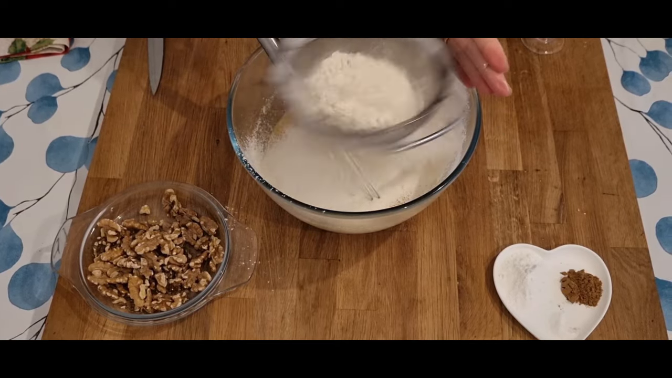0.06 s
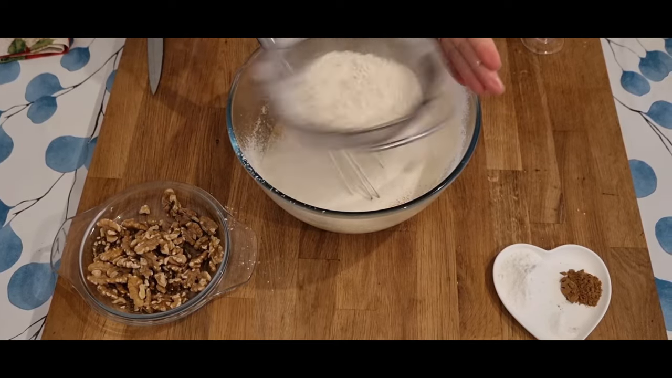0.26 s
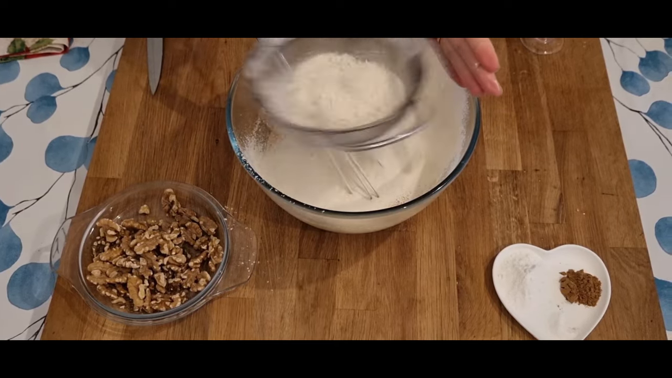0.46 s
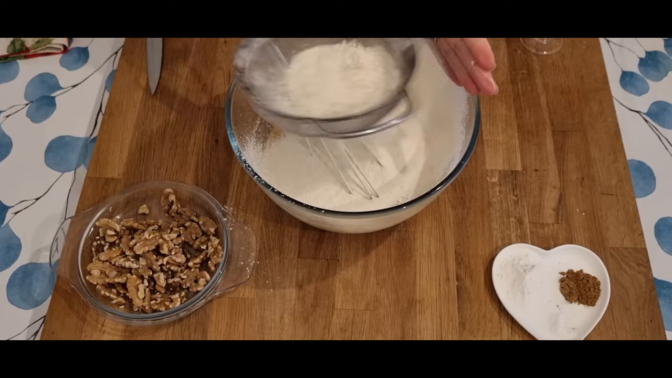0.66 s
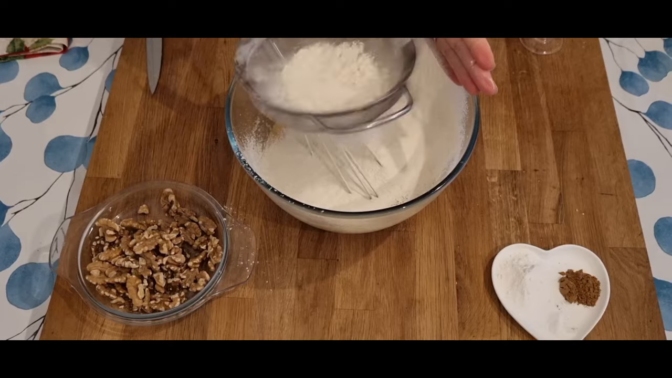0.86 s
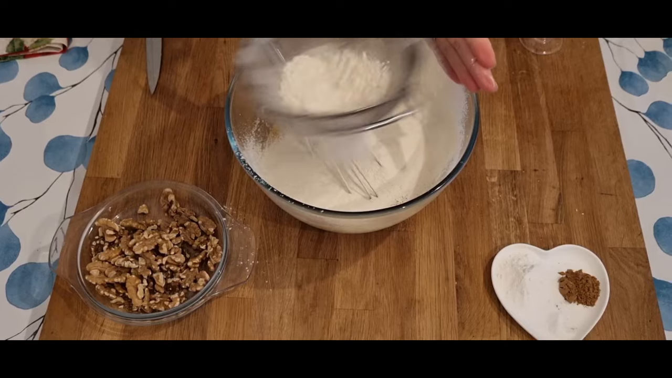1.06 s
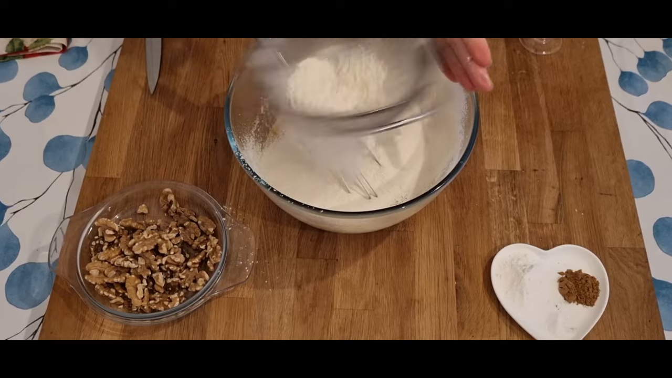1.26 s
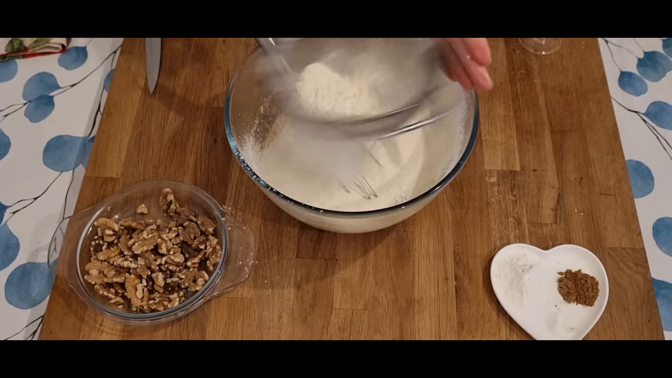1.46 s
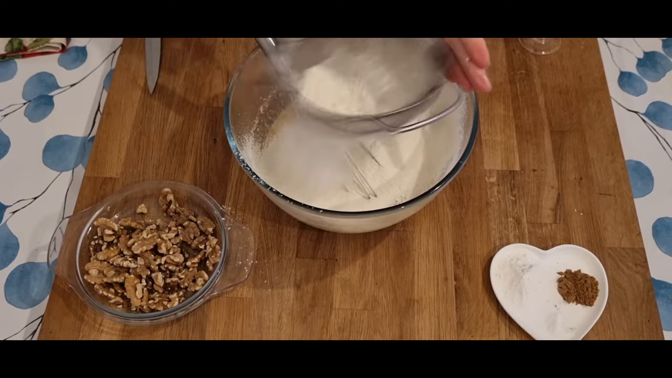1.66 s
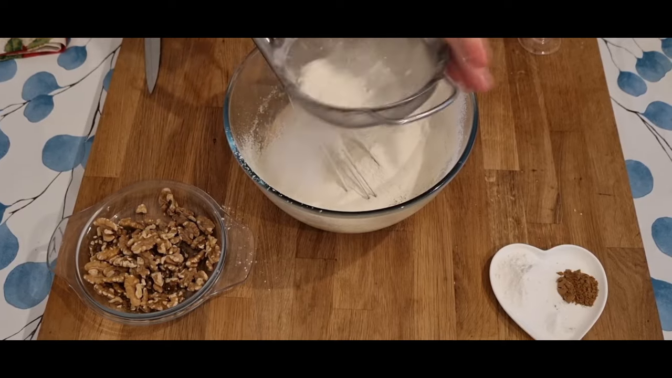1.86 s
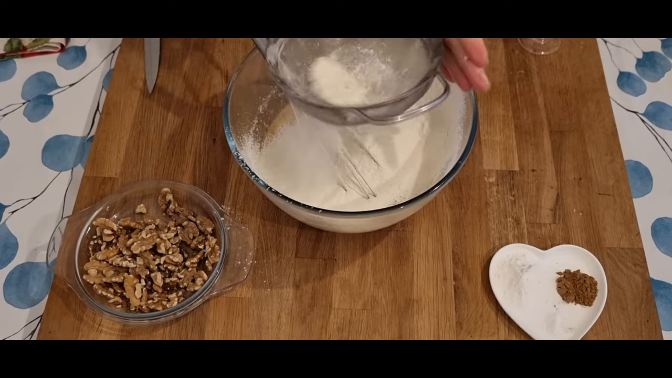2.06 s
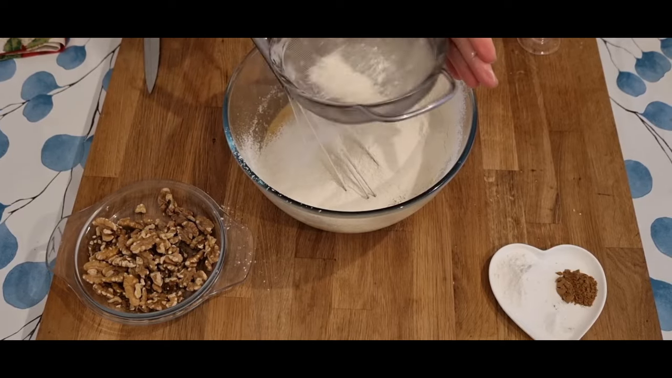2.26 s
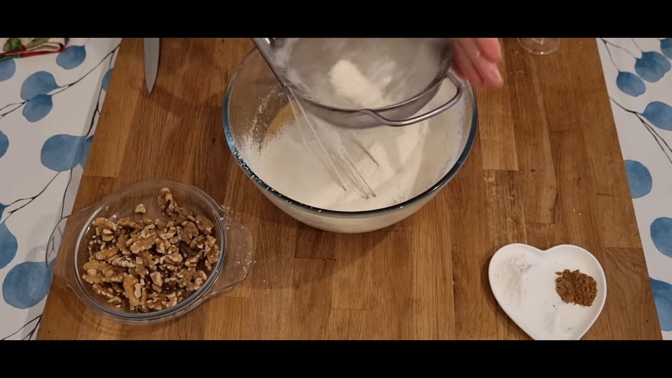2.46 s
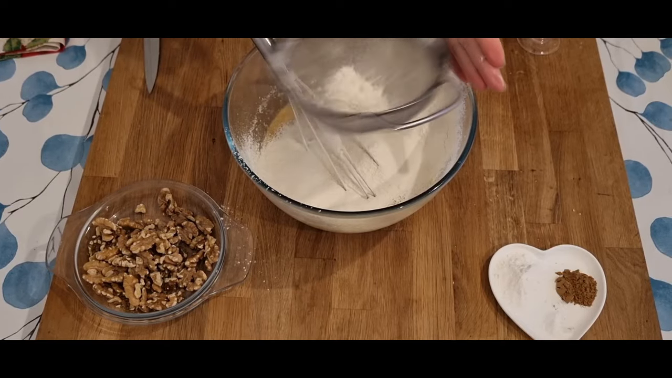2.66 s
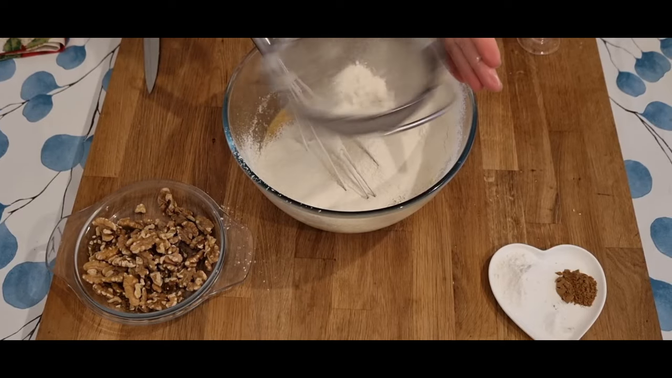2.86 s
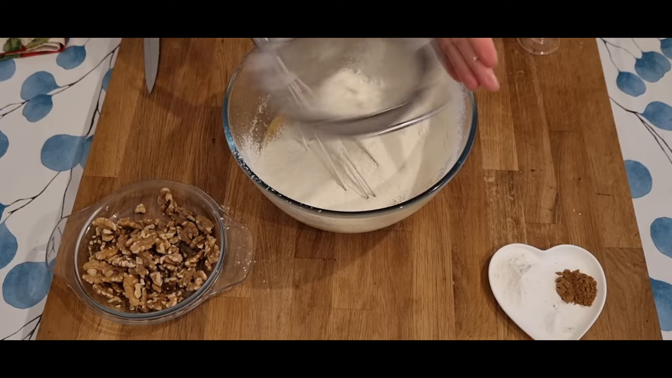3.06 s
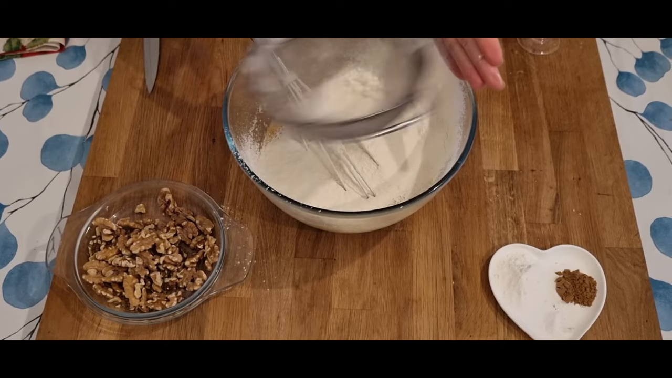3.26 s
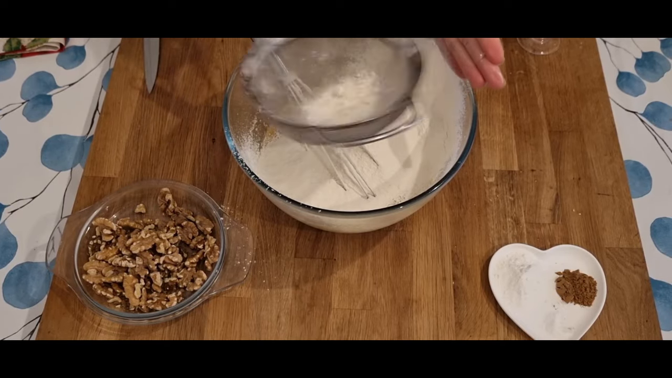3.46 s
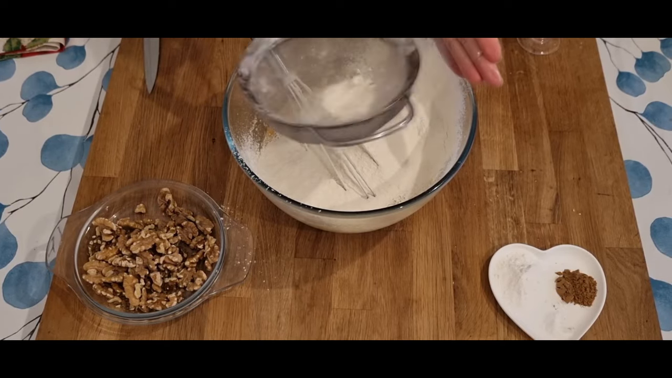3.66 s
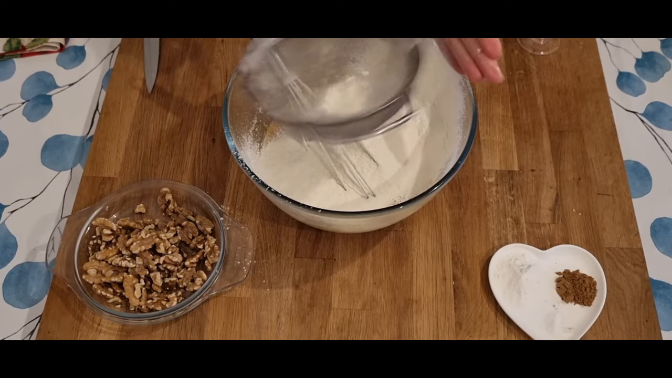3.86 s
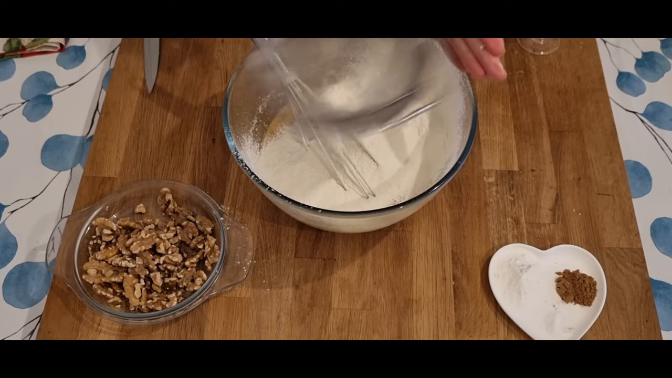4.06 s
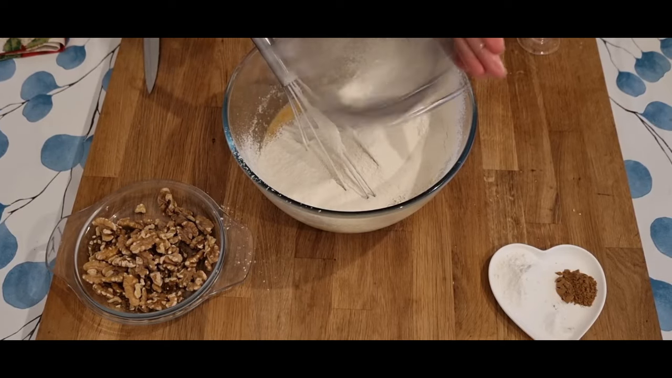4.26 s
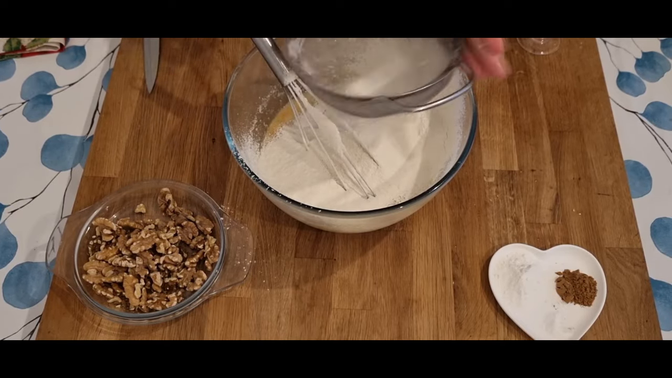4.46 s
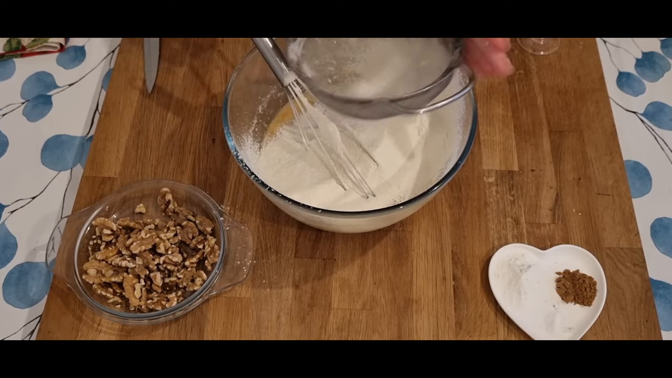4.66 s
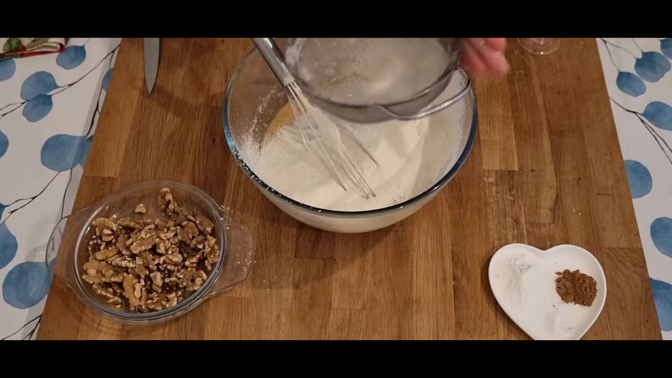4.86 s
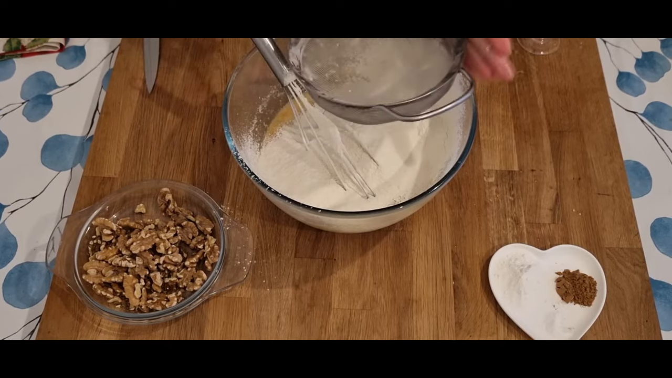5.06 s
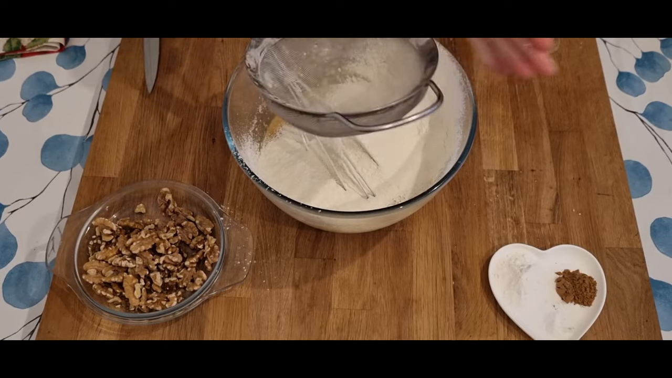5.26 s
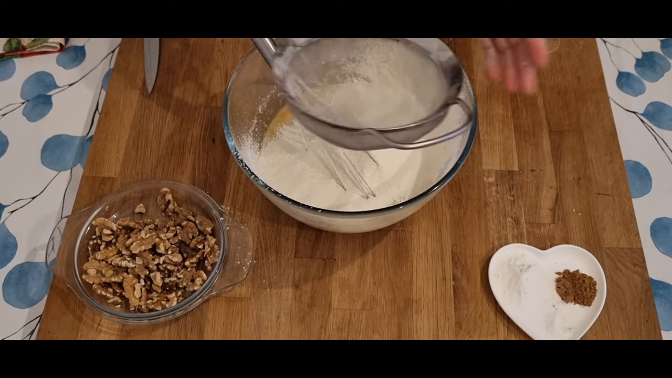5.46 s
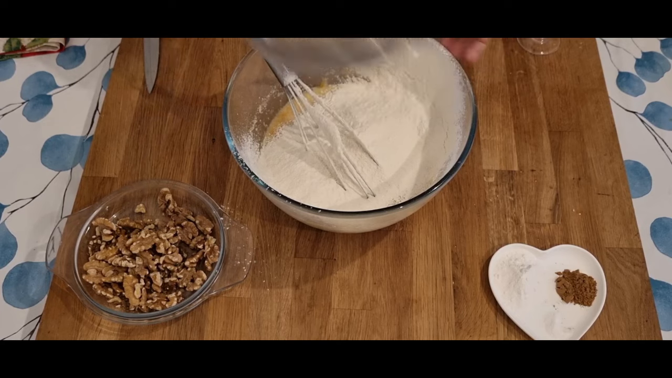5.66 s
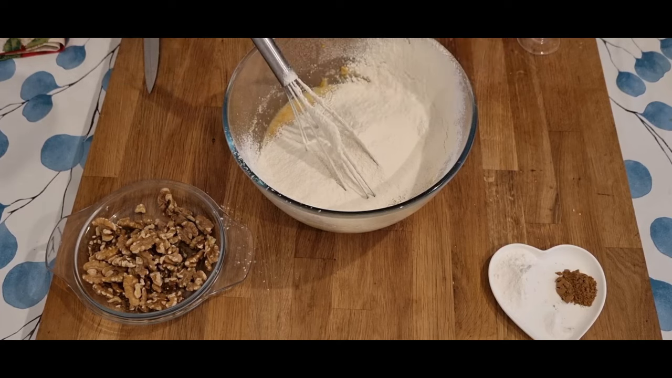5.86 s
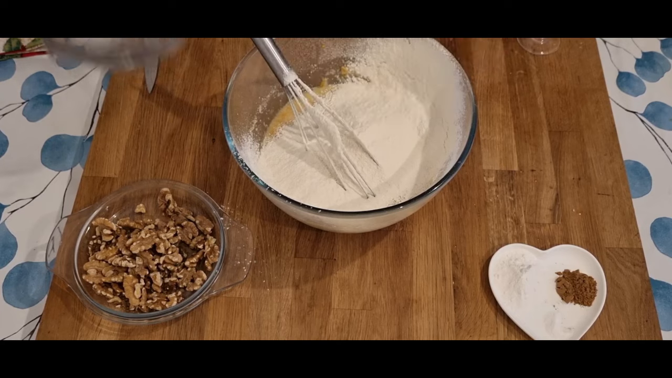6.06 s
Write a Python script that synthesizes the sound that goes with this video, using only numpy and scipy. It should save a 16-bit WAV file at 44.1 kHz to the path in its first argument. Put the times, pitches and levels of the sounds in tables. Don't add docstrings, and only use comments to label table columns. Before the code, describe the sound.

Short bursts of crisp metallic sieve taps with dull hand thumps and a faint flour hiss ring through a small, hard, quietly humming kitchen.

```python
import sys
import numpy as np
from scipy import signal
from scipy.fft import irfft
from scipy.io import wavfile
from scipy.ndimage import uniform_filter1d

SR = 44100
rng = np.random.default_rng(int(sys.argv[2]) if len(sys.argv) > 2 else 0)


def persist_wave(psi):
    counts = np.round(np.clip(psi, -1, 1) * 32767).astype(np.int16)
    wavfile.write(sys.argv[1], SR, np.atleast_2d(counts).T)


def level_to_linear(level):
    exponent = np.asarray(level, float) / 20
    return 10 ** exponent


N = 270093

# [hz, level_db per Hz]
AIR_SPECTRUM = [(25, -19), (60, -11.5), (120, 2.5), (170, -12), (250, -2), (520, -12), (580, -7.5),
                (730, -9), (800, -13.5), (1350, -15.5), (1700, -16), (6300, -35.5), (7500, -51),
                (16000, -54.5)]
AIR_DB = -58.5
# [pitch_hz, width_hz, level_db]
FAN_WHISTLES = [(575, 8, 8), (1495, 12, 10), (6300, 50, 8)]
# [hz, left_right_likeness]
AIR_LIKENESS = [(60, 1), (180, 1), (550, 0.59), (1650, 0.0), (4970, 0.08), (15000, 0.0097)]
# [hz, left_minus_right_db]
AIR_LEAN = [(60, 2.5), (250, -4), (1500, -2), (6000, -7)]

SHAFT_HZ, MAINS_HZ = 30.2, 100.2
MOTOR_ORDERS = [(2, 0), (3, 0), (0, 1), (4, 0), (1, 1), (5, 0), (7, 0), (4, 1), (1, 2), (5, 1), (6, 1),
                (10, 0), (8, 1), (10, 1), (13, 1), (21, 0), (22, 0)]
# [level_db rms, left_minus_right_db]
MOTOR_LEVELS = [(-72.5, -4.5), (-68.5, 3), (-61.5, -3.5), (-54, 0), (-73, 0.5), (-82, 6.5), (-80.5, -22),
                (-66, -2.5), (-73.5, 4.5), (-76, -6.5), (-85, 12), (-76, -2.5), (-73.5, 2), (-75.5, 1),
                (-81, -11), (-77, 14.5), (-76.5, -7.5)]

# [start_s, level_db, brightness_db per octave, favoured_hz, damped_hz]
KNOCKS = [(0.107, -16, -0.5, 4310, 6180), (0.2964, -24.5, -1.4, 3580, 7400),
          (0.6712, -19, -1.3, 10330, 3180), (1.4129, -18, 0.8, 1840, 9300), (1.604, -16, 0.5, 2730, 11600),
          (1.793, -15, 0.6, 2680, 10050), (1.982, -16.1, -0.3, 6260, 12300), (2.5353, -15, 0.3, 9330, 8600),
          (2.7247, -14, -0.16, 8300, 6700), (2.9087, -13, 0.2, 9660, 10140),
          (3.0956, -14, 1.3, 12300, 5960), (3.4745, -13.5, 0.35, 11600, 5860),
          (3.6607, -17, 0.7, 13940, 11300), (3.8475, -15.5, 1.5, 7800, 14640),
          (4.2172, -16, 0.2, 11300, 5640), (4.4, -15, -0.65, 6300, 6900), (4.585, -16.5, -0.66, 3250, 3060),
          (4.774, -16.5, -0.66, 14600, 11600), (4.955, -16, -0.0, 6900, 8340),
          (5.1456, -13.5, -0.1, 7750, 7120)]
# [start_s, level_db, low_ring_db, high_ring_db, mesh_db]
TOUCHES = [
    (-.08, -22.5, 1, 13.5, -0.5),
    (2.353, -47, -2.5, -3, -9),
    (4.035, -51.5, 2, -7, -0.5),
    (5.997, -77, 0, -6.5, -12),
]
COLOUR_HZ = [1200, 3500, 6400, 9200, 13000]
# [hz, level_db]
SIEVE_RING = [(200, -17), (450, -14), (900, -15.5), (2100, -6.5), (2950, 0), (3500, -2), (4500, -7.5),
              (6200, 1), (7100, -2), (8200, -5), (9300, -5), (12700, -2), (15600, -9.5)]
# [pitch_hz, width_hz, level_db]
RING_GAPS = [(850, 37, -7.5), (2500, 150, -13), (3266, 57, -6), (4104, 60, -4), (5570, 390, -4.5),
             (7870, 160, -7), (12300, 100, -4), (13700, 710, -4.5)]
# [pitch_hz, width_hz, level_db]
TICK_NULL = [(5190, 140, -19)]
OVERTONE = 2
FAVOUR_DB, FAVOUR_OVER_DB, DAMP_DB, DAMP_OVER_DB = 3.5, 5, -6.0, -3
GRAIN_DB, GRAIN_COUNT, GRAIN_FULL_HZ = 2.4, 7, 8000

# [hz, left_db, right_db]
PORT_SHADING = [(525, -5.5, -1), (2010, -1.5, 6), (3740, 4.5, 6.5), (6330, 3, 9), (9360, 8, -0.5),
                (12500, 1, 3.5), (13300, 9, 6.5), (16300, -14, -4)]
# [delay_ms, left_db, right_db]
ECHOES = [
    (0, 1.5, 1),
    (2.3, -8.5, -10),
    (3.9, -15.5, -15),
    (5.15, -3, -7),
    (15.2, -17, -8),
]
# [hz, t60_s]
KITCHEN_DECAY = [(500, 0.45), (1300, 0.3), (3500, 0.34), (6300, 0.36), (9200, 0.3), (15000, 0.25)]
# [pitch_hz, width_hz, added_t60_s]
LINGERING = [(2000, 170, 0.091), (3550, 91, .08), (5800, 150, .05)]
# [pitch_hz, width_hz, level_db]
TAIL_SHADING = [(8340, 1400, 4.5), (7130, 360, -7.5)]

# [time_s, pitch_hz]
THUMP_PITCH = [(.7, 520), (1.4, 1030), (2.5, 1187)]
THUMP_DB, THUMP_LEAD_MS, THUMP_FADE_DB_PER_S = -22, 0.24, 2.7
HAND_HZ, HAND_DB, HAND_SPREAD = 483, -28.5, .25

SIFT_DB, SIFT_T60, HEAP_DB, HEAP_T60 = -51, 0.73, -58.5, 2.5
# [start_s, level_db]
SLIDES = [
    (1.2, -82),
    (2.38, -86),
    (4.03, -81),
]
SLIDE_RISE_S, SLIDE_T60 = .02, 0.24
EMPTY_S, RUNS_OUT_S = 5.2, .6

# [hz, level_db]
SMEAR_STEP = [(300, -19), (1300, -3.5), (3000, -4), (8000, -5), (15000, -1.5)]
# [hz, level_db]
SMEAR_FLOOR = [(300, -100), (4000, -89.5), (6500, -84.5), (7500, -70.5), (11000, -72), (12500, -86.5)]
HOP, GRID, SMEAR_SR, EDGE_HZ = 1024, 96, 48000, 15830


def evened(x):
    return x / np.sqrt(np.mean(x ** 2) + 1e-20)


def read(points, hz, count=1):
    table = np.array(points, float)
    return np.interp(np.log(hz + 1), np.log(table[:, 0] + 1), table[:, count])


def bumps(rows, hz):
    return sum(db * np.exp(-.5 * ((hz - f) / width) ** 2) for f, width, db in rows)


def cut(x, edge_hz, size=1601):
    fir = signal.firwin(size, edge_hz, window=("kaiser", 9), fs=SR)
    return signal.oaconvolve(x, fir[None], "same")


def add(mix, s, sound):
    at = round(s * SR)
    sound = sound[:, max(-at, 0):]
    part = mix[:, max(at, 0):][:, :sound.shape[1]]
    part += sound[:, :part.shape[1]]


def air(patchy_db=1.5):
    frames, hz = N // 512 + 5, np.fft.rfftfreq(2048, 1 / SR)
    a, b, c, d, patches = rng.standard_normal((frames, 1025, 5)).T
    patches = uniform_filter1d(patches, size=16, axis=0)
    patches = evened(uniform_filter1d(patches, size=6, axis=1))
    same = np.clip(read(AIR_LIKENESS, hz), -1, 1)[:, None]
    left = a + 1j * b
    right = same * left + np.sqrt(1 - same ** 2) * (c + 1j * d)
    colour_db = (read(AIR_SPECTRUM, hz) + bumps(FAN_WHISTLES, hz))[:, None]
    lean_db = np.outer([.5, -.5], read(AIR_LEAN, hz))[..., None]
    z = np.array([left, right]) * level_to_linear(colour_db + patchy_db * patches + lean_db)
    noise = signal.istft(z, nperseg=2048, noverlap=1536)[1][:, :N]
    return level_to_linear(AIR_DB) * evened(cut(noise, EDGE_HZ))


def fridge():
    t, out = np.arange(N) / SR, np.zeros((2, N))
    turns = rng.random(len(MOTOR_LEVELS))
    for (order, hum), (db, lean_db), turn in zip(MOTOR_ORDERS, MOTOR_LEVELS, turns):
        pitch_hz = order * SHAFT_HZ + hum * MAINS_HZ
        line = np.sqrt(2) * np.sin(2 * np.pi * (pitch_hz * t + turn))
        out += level_to_linear([[db + lean_db / 2], [db - lean_db / 2]]) * line
    return out


def flour():
    grains = rng.standard_normal((2, N)) * level_to_linear(0.93 * rng.exponential(1, (2, N)))
    bright = signal.lfilter(*signal.butter(2, 4000, "high", fs=SR), grains)
    t = np.arange(N) / SR
    starts = [(s, db, SLIDE_T60) for s, db in SLIDES]
    for s, blow_db, *_ in KNOCKS:
        load = np.clip((EMPTY_S - s) / RUNS_OUT_S, .01, 1)
        starts.append((s, blow_db + SIFT_DB + 20 * np.log10(load), SIFT_T60))
    power = level_to_linear(HEAP_DB - 60 * t / HEAP_T60) ** 2
    for s, db, t60 in starts:
        rise = np.clip((t - s) / SLIDE_RISE_S, 0, 1)
        power += rise * level_to_linear(db - 60 * abs(t - s) / t60) ** 2
    return np.sqrt(power) * evened(cut(bright, EDGE_HZ))


def room_tail(start_ms=7.7, rise_ms=3.0):
    size = SR // 2
    taps = np.zeros((2, size))
    at = np.arange(0, size - 12, 12) + rng.integers(0, 12, (2, (size - 1) // 12))
    np.put_along_axis(taps, at, rng.choice([-1., 1.], at.shape), 1)
    hz, t, z = signal.stft(taps, SR, nperseg=256)
    t60 = (read(KITCHEN_DECAY, hz) + bumps(LINGERING, hz))[:, None]
    shade_db = np.outer([1, -1], bumps(TAIL_SHADING, hz))[..., None]
    tail = signal.istft(z * level_to_linear(shade_db - 60 * t / t60), SR, nperseg=256)[1]
    ms = np.arange(tail.shape[1]) / SR * 1000
    tail = tail * np.clip((ms - start_ms) / rise_ms + 1, 0, 1)
    return tail / np.linalg.norm(tail[0])


def palm(t60=0.031, rise_ms=0.77, room_db=-5.0):
    out, t = np.zeros((1, N)), np.arange(4000)[None] / SR

    def thud(db, hz):
        swell = 1 - np.exp(-1000 * t / rise_ms)
        return level_to_linear(db - 60 * t / t60) * swell * np.sin(2 * np.pi * hz * t)

    chances = rng.uniform(-1, 1, len(KNOCKS))
    for (s, blow_db, *_), chance in zip(KNOCKS, chances):
        thump_db = blow_db + THUMP_DB - THUMP_FADE_DB_PER_S * s
        thump_hz = np.interp(s, *np.transpose(THUMP_PITCH))
        add(out, s - THUMP_LEAD_MS / 1000, thud(thump_db, thump_hz))
        add(out, s, thud(blow_db + HAND_DB, HAND_HZ * (1 + HAND_SPREAD * chance)))
    return out + level_to_linear(room_db) * signal.fftconvolve(out, room_tail(), axes=1)[:, :N]


def ringing(hz, count, narrow_hz, wide_hz):
    pitch, width = rng.random((2, 2, count, 1))
    off = hz - 15500 * pitch
    width = narrow_hz + (wide_hz - narrow_hz) * width
    return np.prod((1j * off - width) / (1j * off + width), axis=1)


def tick(hz, colour_db, spots, top_hz=16700):
    db = read(SIEVE_RING, hz) + bumps(RING_GAPS + spots, hz)
    db += bumps(TICK_NULL, hz + rng.normal(0, 70))
    db += np.interp(np.log(hz + 1), np.log(COLOUR_HZ), colour_db)
    chance = uniform_filter1d(rng.standard_normal(len(hz)), size=GRAIN_COUNT)
    chance = evened(uniform_filter1d(chance, size=GRAIN_COUNT))
    db += GRAIN_DB * np.sqrt(np.minimum(hz / GRAIN_FULL_HZ, 1)) * chance
    db -= 40 * np.clip((hz - top_hz) / 300 + 1, 0, 2)
    db += 40 * np.log10((hz + 10) / (hz + 120))
    log_gain = np.log(level_to_linear(db))
    mirrored = np.r_[log_gain, log_gain[-2:0:-1]]
    causal = np.exp(np.conj(signal.hilbert(mirrored))[:len(hz)])
    return causal * ringing(hz, count=12, narrow_hz=200, wide_hz=550)[:1]


def knock(blow_db, colour_db, spots, room, room_db=5.0):
    hz = np.fft.rfftfreq(2048, 1 / SR)
    z = tick(hz, colour_db, spots)
    fade = np.cos(np.linspace(0, np.pi / 2, 2048)) ** 2
    ports = level_to_linear([read(PORT_SHADING, hz, count=k) for k in (1, 2)])
    paths = 0
    for ms, left, right in ECHOES:
        delay = np.exp(-2j * np.pi * hz * ms / 1000)
        scatter = ringing(hz, count=4, narrow_hz=240, wide_hz=550)
        paths = paths + level_to_linear([[left], [right]]) * delay * scatter
    out = level_to_linear(room_db) * signal.fftconvolve(irfft(z) * fade, room, axes=1)
    add(out, 0, irfft(z * ports * paths) * fade)
    return level_to_linear(blow_db + 18.5) * out


def sieve(spot_hz=300, moved=0.45, lag_ms=.6):
    out, kitchen = np.zeros((2, N)), room_tail()
    octaves = np.log2(np.array(COLOUR_HZ) / np.median(COLOUR_HZ))
    hits = []
    for s, db, tilt_db, up_hz, down_hz in KNOCKS:
        spots = [(up_hz, spot_hz, FAVOUR_DB), (OVERTONE * up_hz, spot_hz, FAVOUR_OVER_DB),
                 (down_hz, spot_hz, DAMP_DB), (OVERTONE * down_hz, spot_hz, DAMP_OVER_DB)]
        hits.append((s, db, tilt_db * octaves, spots))
    hits += [(s, db, [0, low, 0, high, mesh], []) for s, db, low, high, mesh in TOUCHES]
    rooms = [cut(np.sqrt(1 - moved) * kitchen + np.sqrt(moved) * room_tail(), EDGE_HZ)
             for _ in range(4)]
    for k, (s, db, colour_db, spots) in enumerate(hits):
        add(out, s + lag_ms / 1000, knock(db, colour_db, spots, rooms[k % len(rooms)]))
    return out


def scene():
    return air() + fridge() + flour() + palm() + sieve()


def smear(x):
    low = cut(x, EDGE_HZ)
    fast = signal.resample_poly(low, 160, 147, axis=1)
    fast = np.pad(fast, ((0, 0), (2 * HOP - GRID, 2 * HOP)), "reflect")
    n, k = np.arange(2 * HOP), np.arange(HOP)
    window = np.sin(np.pi * (n + .5) / (2 * HOP))
    basis = window * np.cos(np.pi / HOP * np.outer(k + .5, n + .5 + HOP / 2)) * np.sqrt(2 / HOP)
    at = HOP * np.arange(fast.shape[1] // HOP - 1)[:, None] + n
    hz = (k + .5) * SMEAR_SR / (2 * HOP)
    bins = (fast[:, at].reshape(-1, 2 * HOP) @ basis.T).reshape(2, -1, HOP)
    level = np.sqrt(abs(uniform_filter1d(bins ** 2, size=9, axis=2)))
    step = np.maximum(level * level_to_linear(read(SMEAR_STEP, hz)), level_to_linear(read(SMEAR_FLOOR, hz)))
    rounded = np.sign(bins) * np.floor(abs(bins) / step + .42) * step * (hz < EDGE_HZ)
    frames = (rounded.reshape(-1, HOP) @ basis).reshape(2, -1, 2 * HOP)
    joined = np.array([np.bincount(at.ravel(), side.ravel(), fast.shape[1]) for side in frames])
    slow = signal.resample_poly(joined[:, 2 * HOP - GRID:], 147, 160, axis=1)[:, :N]
    return slow + x - low


def roll_off(x):
    return signal.sosfilt(signal.butter(12, 16990, fs=SR, output="sos"), x)


def record(dry):
    mix = smear(dry)
    return roll_off(mix)


dry = scene()
out = record(dry)
persist_wave(out)
```